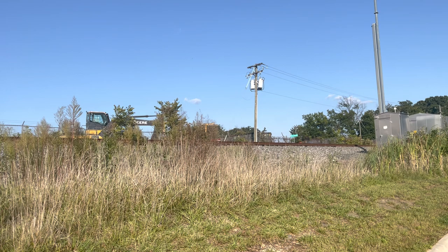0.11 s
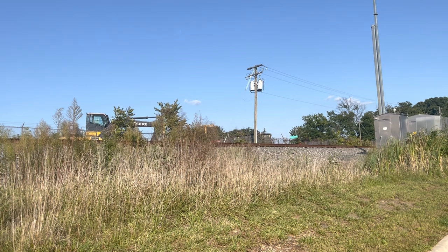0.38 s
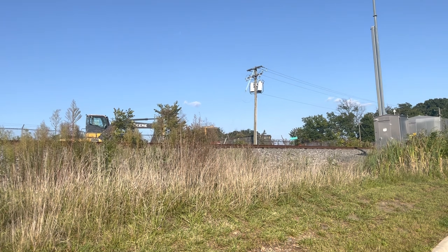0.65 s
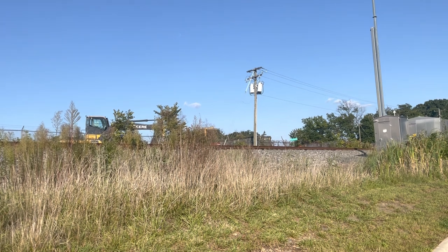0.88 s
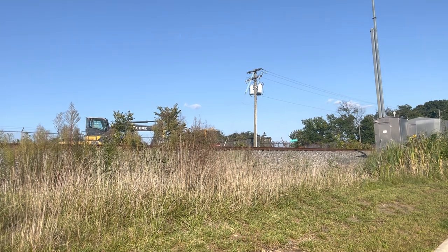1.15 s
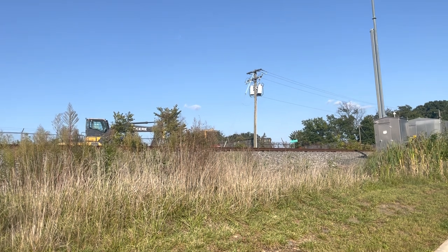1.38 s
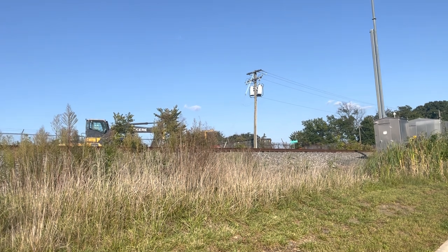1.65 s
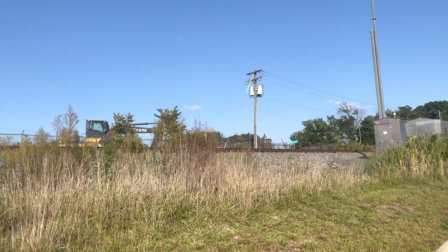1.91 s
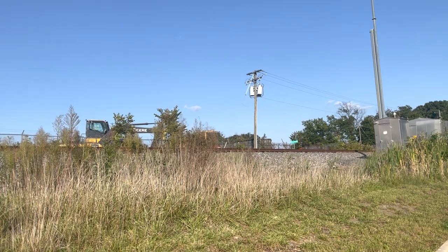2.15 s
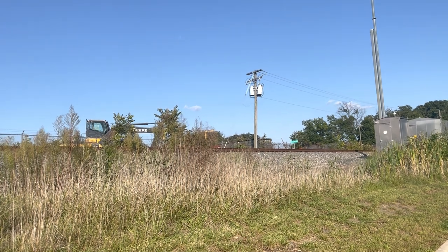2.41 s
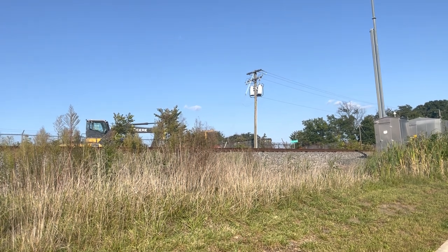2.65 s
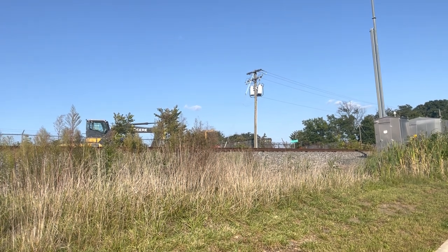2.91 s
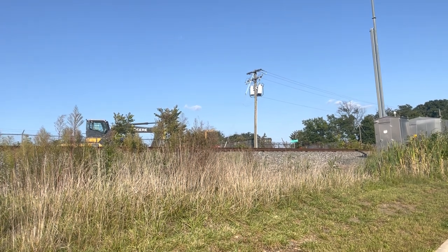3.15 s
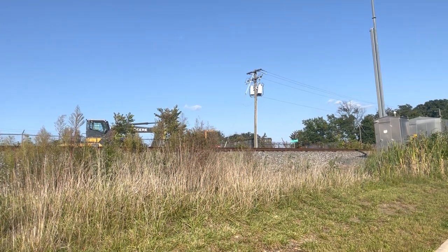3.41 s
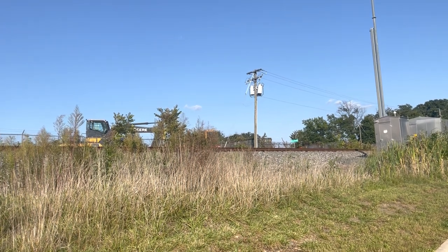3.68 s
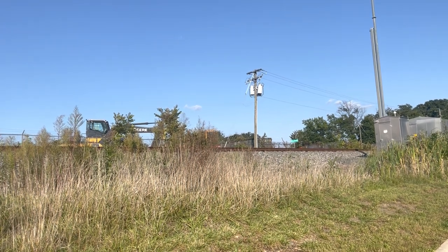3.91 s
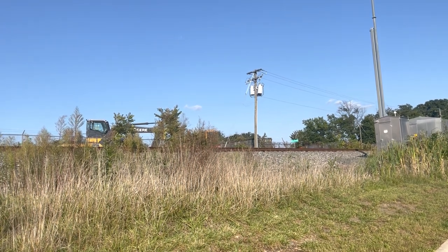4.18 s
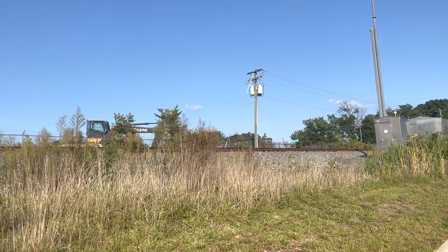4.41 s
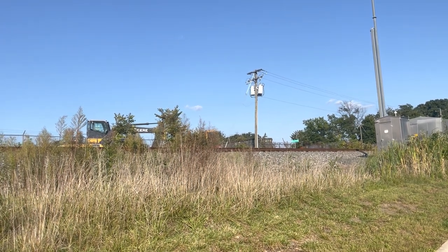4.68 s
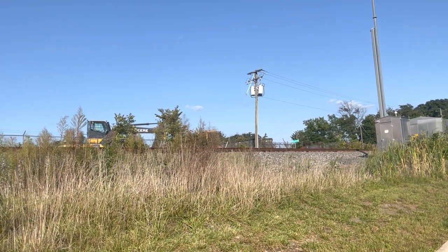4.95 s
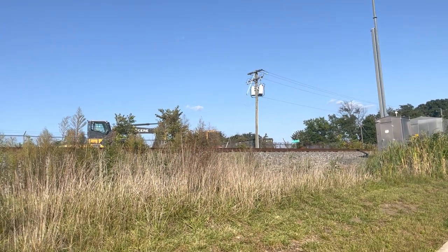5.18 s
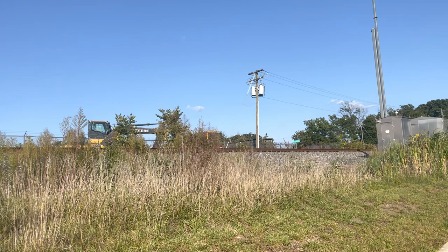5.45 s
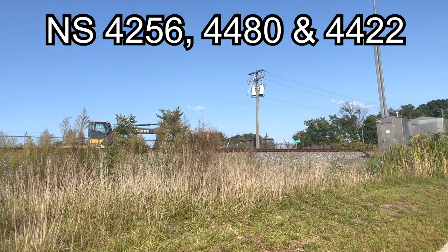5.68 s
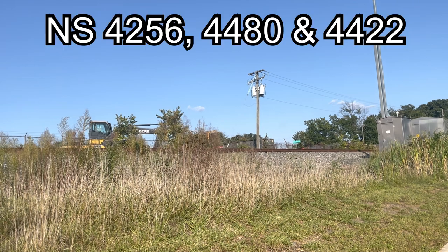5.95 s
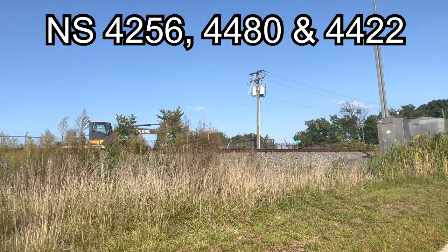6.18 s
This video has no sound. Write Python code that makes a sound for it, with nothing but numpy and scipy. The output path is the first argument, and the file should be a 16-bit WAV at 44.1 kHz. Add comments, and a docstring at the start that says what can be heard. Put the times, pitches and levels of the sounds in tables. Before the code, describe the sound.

Outdoors, a far air horn cuts off with a fading echo, then diesel throb and wheel roar grow under a faint, steady bell.

```python
"""A diesel freight train nears across open ground, heard by two close microphone ports whose phase
difference depends on pitch. First a five-chime air horn, summed from fluttering harmonics, ends a blast
and leaves an echo. Under it run engine firing tones, low rumble and wheel roar of shaped noise, a blower
whine and faint field hiss; a bell of decaying modes keeps striking. The train swells as the distance
shrinks, and singing tones emerge in the roar."""
import sys
import numpy as np
from scipy import signal
from scipy.io import wavfile
from scipy.ndimage import uniform_filter1d

SR = 44100
rng = np.random.default_rng(int(sys.argv[2]) if len(sys.argv) > 2 else 0)


def ratio_of_db(decibels):
    """Turn decibels (scalar or array-like) into linear amplitude factors; 0 dB maps to 1."""
    return 10 ** (np.asarray(decibels, float) / 20)


def unload_audio(sound):
    """Save the sound as a 16-bit wav file, at the path given as the first command line argument."""
    columns = np.transpose(np.atleast_2d(sound))
    # keep every value between -1 and 1, then stretch to whole-number steps
    steps = np.round(np.clip(columns, -1, 1) * 32767)
    wavfile.write(sys.argv[1], SR, steps.astype(np.int16))


N = 278712
T = np.arange(N) / SR

# Noise at the port pair. Each row: frequency in Hz, left-right likeness 0 to 1, left lead in radians.
PORT_PAIR = [(40, .91, -.2), (200, .85, -.3), (300, .88, -.6), (420, .4, 0), (700, .35, 2.6),
             (900, .25, 3.9), (1100, .5, 3), (1350, .67, 3.6), (1650, .77, 3.6), (1950, .45, 3.7),
             (2250, .62, 6), (3000, .25, 8), (3500, .62, 8.9), (4250, .52, 7.4), (4750, .68, 6.8),
             (5200, .1, 7), (5600, .35, 3.8), (6500, .72, 6), (7100, .45, 5.5), (7600, .75, 3.5),
             (8100, .9, 3.14), (9000, .93, 3.14), (10000, .7, 2.9), (11000, .36, 1.6), (12000, .9, 0),
             (15000, .99, 0)]
# Approach of the train. Each row: time in seconds, distance in m.
DISTANCE_M = [(0, 913), (1.5, 583), (2.5, 580), (3.5, 535), (4.5, 482), (5.3, 462), (6.32, 395)]
# Bass swelling or sinking around one pitch. Each row: centre in seconds, length in seconds,
# pitch in Hz, lift in dB.
BASS_SWELLS = [(.3, 0.89, 139, 8), (1.28, 0.11, 170, 1), (1.3, 0.23, 87.6, 4), (1.45, 0.12, 78.6, 1.5),
               (1.9, 0.33, 75, -3.5), (2.6, 0.17, 70, 4), (2.65, 0.071, 102.6, 0), (3.15, 0.088, 97.5, 4),
               (3.45, 0.16, 64.6, 7.5), (3.7, 0.34, 45, -12), (3.9, 0.096, 70, 4), (4.1, 0.079, 96, -3),
               (4.55, 0.18, 103, 7), (5.17, 0.095, 94.8, -4), (5.39, .06, 170, 7), (5.4, .03, 90, 5.5),
               (5.63, 0.1, 95.6, 11), (5.72, 0.044, 55, 16), (5.65, 0.15, 170, 5), (5.45, 0.024, 91, -3),
               (5.66, .02, 89, -9), (5.8, 0.038, 90, -1), (5.94, 0.037, 96, 10), (6.13, 0.2, 92, -14.5),
               (6.32, 0.041, 88, 10)]
SWELL_OCTAVES = 0.27


def evened(x):
    """Scales to rms 1."""
    return x / np.sqrt(np.mean(abs(x) ** 2) + 1e-20)


def read(points, hz, order=1):
    """One column of a spectrum table, on a log frequency axis."""
    table = np.transpose(points)
    return np.interp(np.log(hz + 1), np.log(table[0] + 1), table[order])


def curve(rows, t):
    """The second column of a time table at the times t."""
    s, values = np.transpose(rows)
    return np.interp(t, s, values)


def bumps(rows, hz, octaves, t):
    """Sum in dB of the rows' bell-shaped lifts, as felt at one pitch."""
    s, length_s, centre_hz, db = np.transpose(rows)[:, :, None]
    coarse = t[::256]
    lift_db = db * np.exp(-((coarse - s) / length_s) ** 2 - (np.log2(hz / centre_hz) / octaves) ** 2)
    return np.interp(t, coarse, lift_db.sum(0))


def nearing_db(t):
    """Spreading loss against the nearest point."""
    return -20 * np.log10(curve(DISTANCE_M, t) / DISTANCE_M[-1][1])


def drift(per_s, size):
    """Slow complex random curve of rms 1: 24 rotations with rates spread by per_s."""
    t = T[:size + 256:256, None]
    phase = 2 * np.pi * (per_s * rng.standard_normal(24) * t + rng.random(24))
    slow = evened(np.exp(1j * phase).sum(1))
    return np.interp(T[:size], t[:, 0], slow)


def tone(hz, db, lead_rad, scatter, per_s, size=N, start_turns=None):
    """A steady tone plus a share scattered by moving air and ground, partly other at each port."""
    start_turns = rng.random() if start_turns is None else start_turns
    turn = np.exp(2j * np.pi * (np.cumsum(hz * np.ones(size)) / SR + start_turns))
    shared = 1 + scatter * drift(per_s, size)
    left = shared + 0.5 * scatter * drift(per_s, size)
    right = shared + 0.5 * scatter * drift(per_s, size)
    pair = np.real([turn * left * np.exp(1j * lead_rad), turn * right])
    return np.sqrt(2) * ratio_of_db(db) * pair / np.hypot(1, scatter)


def noise(field_db, patchy_db, size=2048):
    """Random short-time spectra under a field of dB over frequency and time, for the port pair; rms 1."""
    frames = 4 * N // size + 5
    hz = np.fft.rfftfreq(size, 1 / SR)[:, None]
    t = (np.arange(frames) * size / 4) / SR
    a, b, c, d, patches = rng.standard_normal((frames, size // 2 + 1, 5)).T
    patches = uniform_filter1d(patches, size=15, axis=0)
    patches = evened(uniform_filter1d(patches, size=8, axis=1))
    same = np.clip(read(PORT_PAIR, hz), 0, 1)
    right = a + 1j * b
    left = same * right * np.exp(1j * read(PORT_PAIR, hz, order=2)) + np.sqrt(1 - same ** 2) * (c + 1j * d)
    spectra = np.array([left, right]) * ratio_of_db(field_db(hz, t) + patchy_db * patches)
    wave = signal.istft(spectra, nperseg=size, noverlap=size - size // 4)[1]
    return evened(wave[:, :N])


def lean(db):
    """Gains of the left and right port; positive is louder on the left."""
    return ratio_of_db([[db / 2], [-db / 2]])


def release_db(t, stop_s, echo_db=-15):
    """Holds until the air stops, falls fast, and leaves a fading far echo."""
    fall_db_per_s, echo_fall_db_per_s = 57, 16
    late_s = np.maximum(t - stop_s, 0)
    return 20 * np.log10(ratio_of_db(-fall_db_per_s * late_s) + ratio_of_db(echo_db - echo_fall_db_per_s * late_s))


def horn():
    """Five reeds on one air line; distance makes every harmonic flutter on its own, high ones most."""
    # Fundamental of each chime in Hz.
    chimes_hz = [335.5, 393.7, 451.4, 523.3, 656.2]
    # Each row, one chime: third harmonic upward, in dB against the upper level.
    overtones = [
        [8, 3, -5.5, -9.5, -10, -12.5, -13, -11, -16.5, -14.5, -14, -19, -21],
        [3, -3, -3, -13, -10.5, -13.5, -7.5, -12.5, -14, -15.5, -20],
        [2, 2, -4.5, -10.5, -14, -10, -15.5, -15, -19.5],
        [4, -12, -11, -5.5, -15, -18.5, -17.5, -19],
        [-6.5, -5.5, -19, -13, -19.5, -23.5],
    ]
    # Each row, one chime: first harmonic in dB, second in dB, growth in dB per second, reed stop in seconds.
    reeds = [(-36.5, -40, 2.5, 1.18), (-42, -36.5, -3.5, 1.1), (-37, -42.5, 2, 0.92),
             (-42, -53, -0.5, 1.25), (-40.5, -46.5, -1.5, 1.32)]
    # Each row: frequency in Hz, left lead in radians.
    horn_ports = [(300, -1.), (660, -1.), (850, -1.8), (1030, -.8), (1300, -2.1), (1600, -2.7),
                  (1800, -2.2), (1970, -4.2), (2250, -6.4), (2620, -5.1), (3100, -4.3), (3600, -4.2),
                  (4100, -5.), (4700, -5.6)]
    # Moving air lifts or sinks one harmonic. Each row: centre in seconds, length in seconds,
    # pitch in Hz, lift in dB.
    gusts = [(.1, .12, 1364, 1.5), (.35, 0.082, 1000, 7.5), (.35, 0.084, 2020, 11), (.45, 0.03, 676, -7),
             (.6, 0.18, 1330, -2.5), (.65, .2, 1805, 4.5), (.7, 0.078, 2270, 5), (.9, 0.14, 2740, 2),
             (.97, .13, 1350, 10), (.95, 0.072, 1180, -6), (1.17, 0.082, 1006, 3), (1.05, 0.11, 667, -6),
             (1.45, 0.22, 664, -8), (.05, 0.1, 787, -11), (.4, 0.098, 523, 0), (.55, 0.24, 903, -8.5),
             (.73, 0.11, 451, 2.5), (.77, .05, 394, -1), (.9, 0.18, 787, -8.5), (.95, 0.091, 903, 6),
             (1.03, 0.05, 523, 6), (1.2, .1, 787, 2)]
    # Blast between its lines. Each row: frequency in Hz, level in dB.
    smear_colour = [(100, -87), (250, -25.5), (350, -3), (700, -5), (1300, -6.5), (1700, -14.5),
                    (2400, -23.5), (3000, -26), (5000, -27), (5600, -35.5), (6800, -36.5), (8000, -52),
                    (11000, -93.5)]
    gust_octaves = 0.03
    upper_db, upper_stop_s = -57, 1.31
    early_s_per_khz = 0.042  # treble stops sooner
    scatter_per_khz, echo_scatter = 0.64, 2.5
    flutter_per_s, flutter_rise_per_khz = 2.995, 2.5
    smear_db, smear_echo_db = -44, -5.5  # rms over the whole scene; smear echoes more than the lines
    end_s, fade_s = 2.4, 0.6

    size = min(round(end_s * SR), N)
    t, out = T[:size], np.zeros((2, size))

    def treble_db(hz, t, echo_db=-15):
        return release_db(t, upper_stop_s - early_s_per_khz * np.minimum(hz / 1000, 8), echo_db)

    for chime_hz, over_db, (first_db, second_db, growth, stop_s) in zip(chimes_hz, overtones, reeds):
        wobble = 1 + 0.00053 * drift(7.1, size).real
        reed_db = growth * np.minimum(t, stop_s) + release_db(t, stop_s)
        in_echo = np.clip((t - stop_s) / 0.32, 0, 1)
        harmonics_db = [reed_db + first_db, reed_db + second_db] + [upper_db + o for o in over_db]
        for n, db in enumerate(harmonics_db, 1):
            hz = n * chime_hz
            khz = hz / 1000
            scatter = min(scatter_per_khz * khz, 1.2) + echo_scatter * in_echo
            db = db + bumps(gusts, hz, gust_octaves, t)
            if n > 2:
                db = db + treble_db(hz, t)
            per_s = flutter_per_s + flutter_rise_per_khz * khz
            out += tone(hz * wobble, db, read(horn_ports, hz), scatter, per_s, size=size)
    # air rush and far echoes smear the blast between its lines
    smear = noise(lambda hz, t: read(smear_colour, hz) + treble_db(hz, t, smear_echo_db), 1.5)[:, :size]
    out = (out + ratio_of_db(smear_db) * smear) * np.clip((size / SR - t) / fade_s, 0, 1)
    return np.pad(out, ((0, 0), (0, N - size)))


def exhaust():
    """Tones on multiples of the firing cycle; the strong lock into pulses and grow, the weak waver."""
    # Each row: multiple of the cycle, level in dB ahead of the gains below.
    orders = [(4, -62), (5, -39.5), (6, -38), (7, -37.5), (8, -29.5), (9, -40.5), (10, -51), (11, -27),
              (12, -34), (13, -32), (14, -51), (15, -56.5), (16, -41.5), (17, -46), (18, -59), (19, -65.5),
              (20, -48.5), (21, -46.5), (22, -45.5), (23, -56), (24, -54)]
    # Multiples that lock into the pulse.
    strong = [5, 8, 11, 13]
    cycle_hz = 8.715  # four-stroke cycles
    strong_gain, weak_gain = 1.08, 0.099  # dB per dB of approach
    pulse_s, pulse_turns = 0.0069, 0.66  # first time the strong tones line up; pulse shape
    near_db, out = nearing_db(T), 0
    for k, db in orders:
        hz = cycle_hz * k
        db = db + bumps(BASS_SWELLS, hz, SWELL_OCTAVES, T)
        if k in strong:
            start_turns = pulse_turns - hz * pulse_s
            out = out + tone(hz, db + 2.0 + strong_gain * near_db, -0.15, 0.2, 1.5, start_turns=start_turns)
        else:
            out = out + tone(hz, db + weak_gain * near_db, -0.25, 0.94, 0.58)
    return out


def rumble():
    """Uneven combustion and ground-borne thudding: noise in two low bands."""
    # Each row: frequency in Hz, level in dB.
    deep_colour = [(15, -45), (28, -19), (42, 7.5), (70, 7.5), (100, 6.5), (125, -0.5), (150, -17.5),
                   (200, -47), (400, -130)]
    # Each row: frequency in Hz, level in dB.
    thud_colour = [(40, -75), (90, -19), (130, 2), (160, -2.5), (200, -6.5), (240, -9.5), (310, -12),
                   (360, -25), (500, -53.5), (1000, -130)]
    # level at the nearest point ahead of the swells, dB per dB of approach, pitch for the swells
    deep_near_db, deep_gain, deep_hz = -23, 1.9, 75
    thud_near_db, thud_gain, thud_hz = -30.5, 1.47, 170
    near_db = nearing_db(T)
    deep_db = deep_near_db + deep_gain * near_db + bumps(BASS_SWELLS, deep_hz, SWELL_OCTAVES, T)
    thud_db = thud_near_db + thud_gain * near_db + bumps(BASS_SWELLS, thud_hz, SWELL_OCTAVES, T)
    deep = noise(lambda hz, t: read(deep_colour, hz) + 0 * t, 0.34, size=4096)
    thud = noise(lambda hz, t: read(thud_colour, hz) + 0 * t, 0.88, size=4096)
    return ratio_of_db(deep_db) * deep + ratio_of_db(thud_db) * thud


def roar():
    """Wide wheel noise that brightens as less air lies between, with a few singing tones."""
    # Each row: frequency in Hz, level in dB.
    roar_colour = [(100, -46), (200, -24.5), (330, 2), (600, 2.5), (720, -4.5), (950, -1.5), (1400, -6),
                   (1650, -10), (2000, -9), (2120, -15.5), (3700, -18.5), (4200, -20.5), (5350, -21),
                   (5480, -26), (5900, -26.5), (6500, -23.5), (7300, -29), (9000, -32), (10000, -30.5),
                   (11000, -45.5), (12000, -49), (14500, -54), (15200, -82)]
    # Singing tones in Hz.
    singing_hz = [316, 940, 1051, 1421]
    # Each row, one singing tone: fuzz width in Hz, level in dB against the roar ahead of the emergence.
    singing = [(8, -3), (8, -4), (6, -11), (7, -9.5)]
    # Singing tones emerge as the train nears. Each row: time in seconds, gain in dB.
    emergence = [(0, -16), (3.5, -10.5), (5.2, -5), (5.6, 0.5), (6.32, -0.5)]
    near_level_db, gain = -39.5, 0.65  # gain in dB per dB of approach
    treble_db, air_db_per_m = 5.5, 0.0733  # both at 8 kHz

    def air_db(t):
        return treble_db - air_db_per_m * (curve(DISTANCE_M, t) - DISTANCE_M[-1][1])

    wide = noise(lambda hz, t: read(roar_colour, hz) + air_db(t) * np.minimum(hz / 8000, 1) ** 2, 0.93)
    sing = sum(tone(hz, db, read(PORT_PAIR, hz, order=2), 1, width_hz)
               for hz, (width_hz, db) in zip(singing_hz, singing))
    return ratio_of_db(near_level_db + gain * nearing_db(T)) * (wide + ratio_of_db(curve(emergence, T)) * sing)


def blower():
    """A wavering whine near 290 Hz and its fuzzier octave."""
    # Each row: time in seconds, pitch in Hz.
    whine_pitch = [(0, 285), (3.3, 285), (4.5, 288), (5.5, 290), (6.32, 292)]
    # Each row: time in seconds, level in dB.
    whine_level = [(0, -52), (2.9, -55.5), (3.4, -45), (3.95, -41), (4.5, -42), (5.2, -53.5), (5.4, -43),
                   (5.6, -41), (5.85, -33), (6, -36), (6.1, -33.5), (6.32, -31.5)]
    hz, db = curve(whine_pitch, T), curve(whine_level, T)
    whine = tone(hz, db, -0.65, 0.3, 4.0)
    octave = tone(2 * hz, 0, 1.1, 1, 4)
    return whine + ratio_of_db(0.81 * db - 23.5) * octave


def field():
    """The open field's own faint treble hiss, with very faint fluttering high tones."""
    # Each row: frequency in Hz, level in dB.
    hiss_colour = [(3000, -46.5), (6000, -14), (8000, -4.5), (9500, 8), (11000, -13.5), (12000, -13.5),
                   (14400, -12.5), (15000, -44.5)]
    # Each row: frequency in Hz, level in dB.
    thin_tones = [(11902, -99), (12096, -100)]
    hiss = ratio_of_db(-70.0) * noise(lambda hz, t: read(hiss_colour, hz) + 0 * t, 1.5)
    return hiss + sum(tone(hz, db, 0, 1.5, 9.0) for hz, db in thin_tones)


def bell():
    """Each strike adds a decay to the modes; far reflections soften the attack and move the ring about."""
    # Modes in Hz.
    modes_hz = [1980, 1994, 2040, 2820]
    # Each row, one mode: level in dB against the strike, 60 dB decay in seconds, share of the strike's tilt.
    modes = [(0, 2.8, -.5), (0, 2.8, .5), (-9, 1.5, 0), (-18, 1., 0)]
    # The clapper lands unevenly, so one of the close pair of modes leads.
    # Each row: start in seconds, level in dB, tilt in dB of the pair's upper mode over its lower.
    strikes = [(0.131, -52, 4), (.83, -56, 9.5), (1.52, -58, -11), (2.15, -58.5, -15), (2.88, -58, -11),
               (3.63, -57, 3), (4.28, -57, -3.5), (5., -62.5, -2), (5.75, -53.5, 1)]
    rise_s = 0.1
    lead_rad = 1.44 + 0.98 * drift(1.4, N).real
    out = np.zeros((2, N))
    for hz, (db, t60_s, side) in zip(modes_hz, modes):
        ring = 0
        for start_s, strike_db, tilt_db in strikes:
            decay_db = -60 * np.maximum(T - start_s, 0) / t60_s
            rise = np.clip((T - start_s) / rise_s, 0, 1)
            ring = ring + ratio_of_db(strike_db + side * tilt_db + decay_db) * rise
        out += ring * tone(hz, db, lead_rad, 0.45, 2.5)
    return out


def scene():
    """The train leans a little to the left, the horn slightly to the right; the field stays even."""
    train = exhaust() + rumble() + roar() + blower() + bell()
    return horn() * lean(-0.5) + train * lean(1.05) + field()


def top_cut(x):
    """Nothing passes above the cut-off."""
    return signal.sosfilt(signal.butter(12, 14900, fs=SR, output="sos"), x)


def record(dry):
    """Fades both ends over 3 ms."""
    mix = dry * np.clip(np.minimum(T, T[-1] - T) / 0.003, 0, 1)
    return top_cut(mix)


dry = scene()
out = record(dry)
unload_audio(out)
```